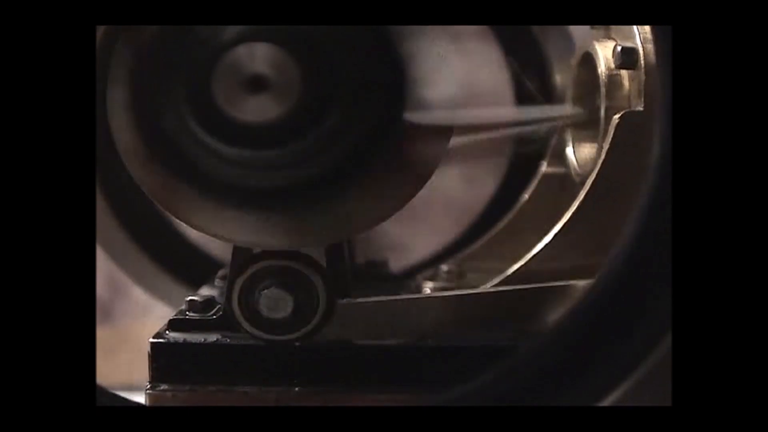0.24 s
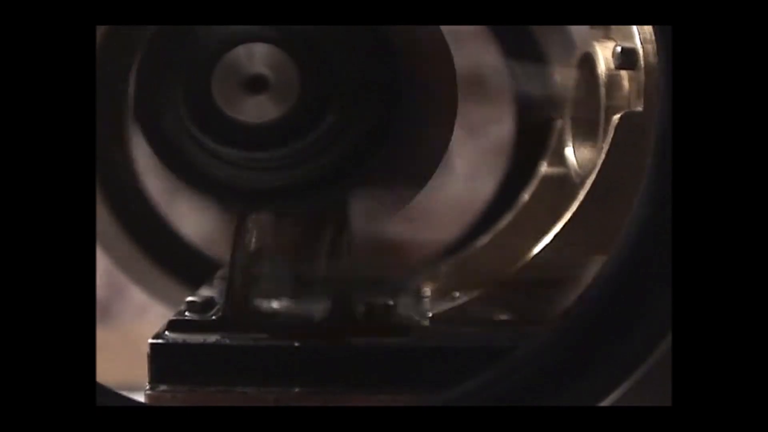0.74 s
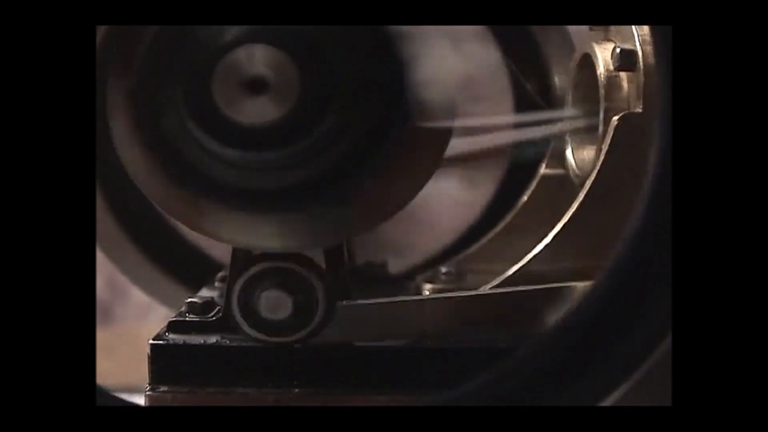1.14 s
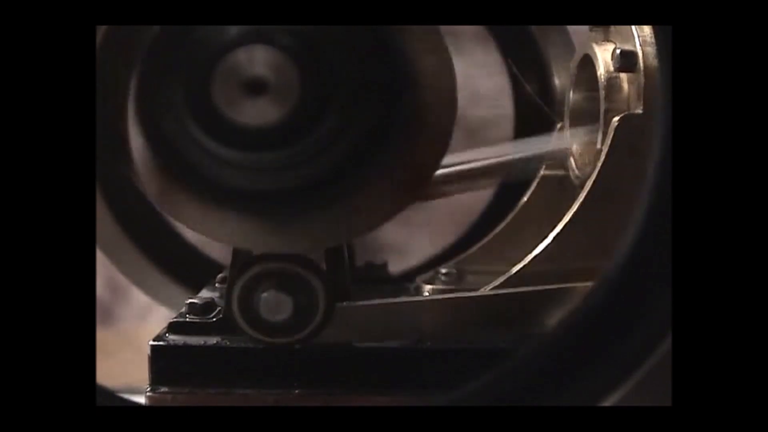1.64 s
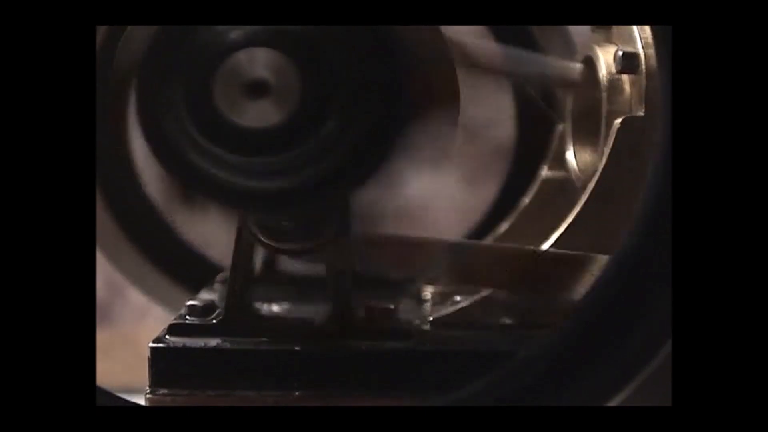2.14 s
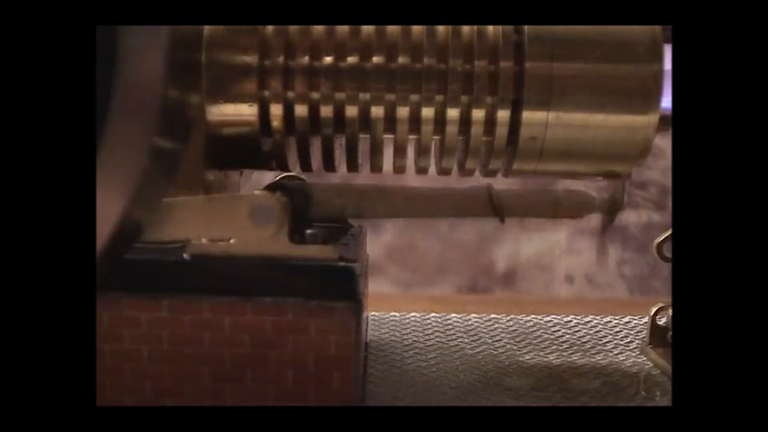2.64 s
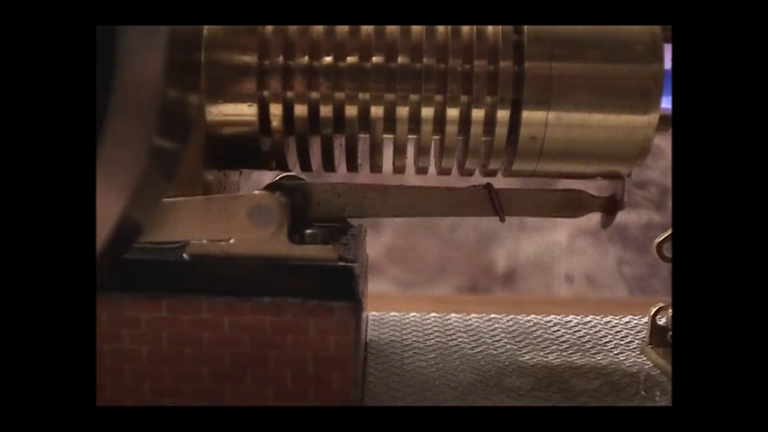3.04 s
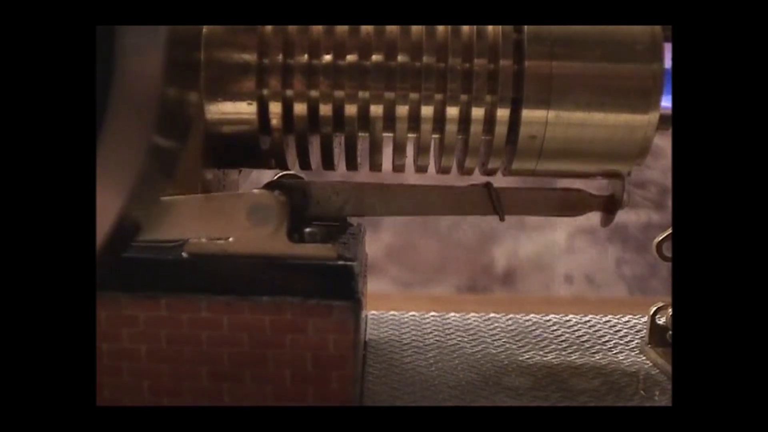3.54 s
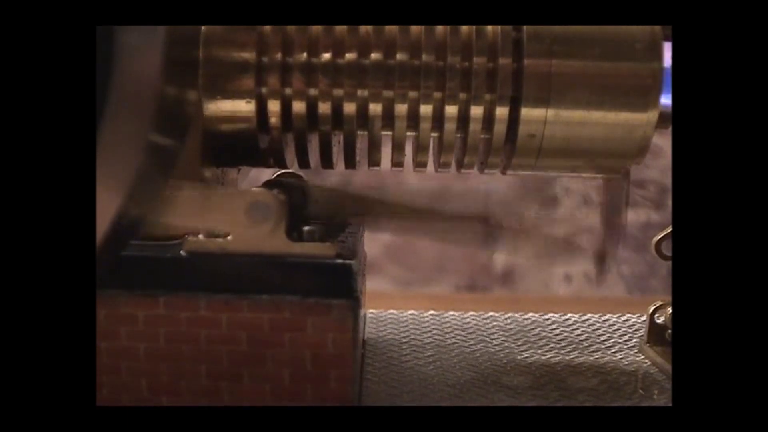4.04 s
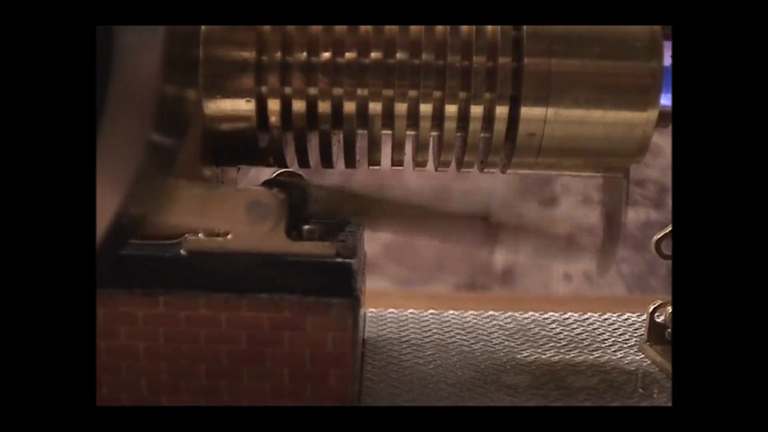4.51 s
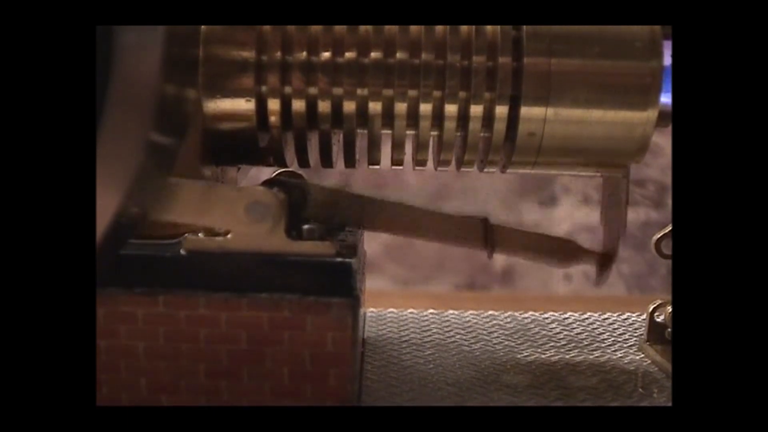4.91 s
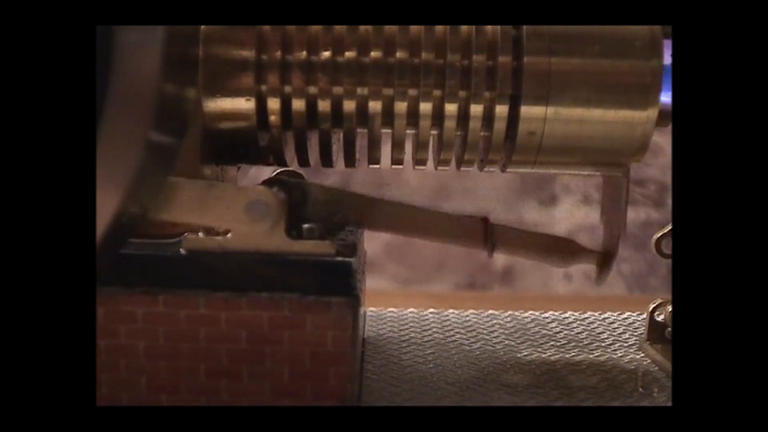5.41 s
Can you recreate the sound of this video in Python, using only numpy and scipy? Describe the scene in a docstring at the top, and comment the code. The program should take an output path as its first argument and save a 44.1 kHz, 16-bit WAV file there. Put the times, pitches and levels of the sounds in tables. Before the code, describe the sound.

Rapid, regular exhaust pops and light metallic rattling from a little flame-driven engine, with a sudden step up in pace partway through.

```python
"""A quick, even chuff and clatter: a small flame-licker engine on a bench, heard beside the flywheel,
then, running faster, beside the cylinder. On every turn the flap valve pops open and flutters in the
exhaust, the cam roller rattles, the lever knocks, and the valve is slapped shut, which rings the metal.
Bearings rub softly; the room is small and dry."""
import sys
import numpy as np
from scipy import signal
from scipy.fft import rfft, irfft
from scipy.io import wavfile
from scipy.ndimage import uniform_filter1d

SR = 44100
rng = np.random.default_rng(int(sys.argv[2]) if len(sys.argv) > 2 else 0)


def pcm_store(signal):
    """Save signal as 16-bit PCM."""
    levels = np.round(np.clip(np.atleast_2d(signal), -1, 1) * 32767)
    wavfile.write(sys.argv[1], SR, levels.astype(np.int16).T)


N = 250047
ANTIPHASE = np.array([[1], [-1]])


# Spectrum of a blow, by part: f/Hz, level/dB
FLYWHEEL_SPECTRA = {"valve": [(90, 16.5), (520, 9), (830, -3.5), (2030, 13), (2230, 1.5), (3940, 10),
                    (4650, 3.5), (5200, -1), (8000, -2), (9220, -22), (10620, -19), (11140, -42),
                    (15500, -35)], "roller": [(90, 24), (600, 6), (720, 4), (1940, 6.5), (2130, 1.5),
                    (2460, 3.5), (2970, 2.5), (3760, 11), (4540, -0.5), (5480, 10), (6620, 3.5),
                    (7630, 0.5), (10620, -8), (15500, -51)], "lever": [(90, 19.5), (720, 14), (910, 4),
                    (2130, 3.5), (2460, 14), (2970, -11), (3420, 8), (4540, 6), (6620, 8), (7630, -6),
                    (8790, 1), (13450, -18), (15500, -32)], "seat": [(90, 53), (520, -8.5), (620, -51),
                    (1000, 19), (1390, 10), (1680, 22.5), (2700, 8), (3940, 13), (4330, 1.5), (6620, 1.5),
                    (13450, -23), (15500, -38)]}
CYLINDER_SPECTRA = {"valve": [(150, -7), (300, 12), (560, 12), (790, -5), (1250, -9), (2000, 13),
                    (2700, 14.5), (3900, 7.5), (4800, 0), (5400, 1.5), (6600, -6.5), (8400, -9),
                    (10000, -16), (15500, -28)], "roller": [(90, 18), (290, 7.5), (470, -15), (600, 3),
                    (830, -22), (1100, 4), (1390, -9), (2460, 3), (3760, 6), (4330, -7), (6620, 6),
                    (7630, -2.5), (8790, 4.5), (15500, -41)], "lever": [(200, 28), (400, -6), (600, 3),
                    (1000, -5), (1400, -2), (2500, 2.5), (3700, 14), (4330, -2), (6600, 10), (7630, -5),
                    (8750, 12.5), (10200, -19), (11900, -2.5), (15500, -38)], "seat": [(200, 5.5), (420, 3),
                    (720, -12), (1150, 14.5), (1400, 2), (1720, 18), (2600, 5), (4330, 0), (6600, 0),
                    (7630, -16), (8790, -2.5), (11700, -11.5), (15500, -37)]}

def engine(turns, contacts, spectra, modes, gas, roller_ring_db, pan_db):
    """Gas and metal from one listening place; small parts radiate little bass."""
    pop = valve_pop(turns, contacts, spectra["valve"])
    rattle = roller_rattle(turns, contacts, spectra["roller"], roller_ring_db)
    knock = lever_knock(turns, contacts, spectra["lever"])
    hits = ticks_and_slap(turns, contacts, spectra["seat"])
    metal = butter(rattle + knock + hits, 3, 340, "highpass")
    chuff = butter(gas + pop, 3, 175, "highpass")
    return (chuff + metal + frame_ring(turns, contacts, modes)) * undb(ANTIPHASE * pan_db / 2)


# Crank speed: t/s, speed/rpm
FLYWHEEL_SPEED = [(0, 394.5), (0.4, 395.1), (2.47, 387.1)]
CYLINDER_SPEED = [(2.47, 467.2), (3.4, 468.8), (4.2, 464.2), (5.67, 459.9)]
# Exhaust strength, wandering with the flame: t/s, level/dB
EXHAUST_STRENGTH = [(0.0, -1), (1.02, 1.1), (1.18, -1), (1.64, 0.4), (2.1, -0.1), (2.25, 4), (2.58, -3),
                    (2.71, -1), (2.96, -2.5), (3.35, 2.7), (3.73, -2), (3.86, 4.5), (3.99, 2.7), (4.12, -3),
                    (4.25, 0.5), (4.77, 3), (4.9, -0.8), (5.55, 3.5)]

def crank(speed, first_shut_s, open_share=0.655):
    """The cam works the valve once a turn. Rows: opens/s, shuts/s, exhaust level/dB, flutter beats."""
    t = seconds(N / SR + 1) - .5
    revs = np.cumsum(np.interp(t, *np.transpose(speed))) / 60 / SR
    revs -= np.interp(first_shut_s, t, revs)
    turn = np.arange(np.interp(speed[-1][0], t, revs) + open_share)
    opens_s, shuts_s = np.interp(turn - open_share, revs, t), np.interp(turn, revs, t)
    exhaust_db = np.interp(opens_s, *np.transpose(EXHAUST_STRENGTH)) + rng.standard_normal(len(turn))
    beats = 2.46 + 0.27 * exhaust_db
    return list(zip(opens_s, shuts_s, exhaust_db, beats))


# Exhaust resonances: f/Hz, width/Hz, level/dB
EXHAUST_MODES = [(276, 105, -1), (406, 74, -1), (592.4, 79, 0), (972, 110, -3.5), (1460, 730, -3),
                 (1910, 120, -28)]

def exhaust(turns, flutter_hz, first_db, build_up, puff_ms, lead_ms, max_beats=6):
    """Gas escapes in one puff as the valve lifts, then in a few quickening ones as the flap flutters."""
    gas, t = np.zeros(N), seconds(.004) - .002
    for opens_s, _, db, beats in turns:
        # stronger exhaust: steeper puffs, faster flutter
        sigma_ms = puff_ms * undb(-.5 * db)
        puff = np.exp(-.5 * (1000 * t / sigma_ms) ** 2)
        puff /= puff.sum()
        start_s = opens_s + t[0] - lead_ms / 1000
        add(gas, start_s, undb(first_db) * puff)
        for k in range(max_beats):
            envelope = np.clip(beats - k - 1 / 3, 0, 1) * (build_up if k == 0 else 1)
            gain = envelope * undb(db + rng.standard_normal())
            beat_s = (k + 1) ** .88 / flutter_hz / (1 + .012 * db)
            add(gas, start_s + beat_s * (1 + 0.0092 * rng.standard_normal()), gain * puff)
    turbulence = 1 + 0.32 * rng.standard_normal(N)
    return resonate(gas * turbulence, EXHAUST_MODES)


def valve_pop(turns, contacts, spectrum):
    """The flap pops open with a sharp pulse."""
    force = blows(turns, contacts, "valve", spike=2.5, fresh=.35, width=.2)
    return convolve(force, colour(spectrum, lag_ms=0.52))


def ticks_and_slap(turns, contacts, spectrum):
    """Dull ticks and knocks during the stroke, then the slap of the valve shutting."""
    force = blows(turns, contacts, "seat", spike=0.28, fresh=0.49, width=0.22)
    return convolve(force, colour(spectrum, lag_ms=2.956))


def lever_knock(turns, contacts, spectrum):
    """The lever knocks before the valve shuts."""
    force = blows(turns, contacts, "lever", spike=0, fresh=0.32, width=0.19)
    return convolve(force, colour(spectrum, lag_ms=1.86))


# Roller and arm resonances: f/Hz, width/Hz, level/dB
ROLLER_MODES = [(2310, 38, 11.5), (3530, 55, 7.5), (4005, 140, 11.5), (5290, 52, 2.5), (6720, 210, 9.5),
                (8630, 14, 8.5)]

def roller_rattle(turns, contacts, spectrum, ring_db):
    """The roller rattles on the cam and rings briefly with its arm."""
    force = blows(turns, contacts, "roller", spike=0, fresh=0.9, width=0.18)
    return convolve(force, colour(spectrum, lag_ms=0.82)) + undb(ring_db) * resonate(force, ROLLER_MODES)


# Contacts per turn: phase (0 opens, 1 shuts), part, level/dB, decay/ms (capped at 4), jitter/ms
# "seat" rows: a dull tick, a knock, then the shutting slap
FLYWHEEL_BLOWS = [(-.004, "valve", 1, 1.9, 0.26), (0.224, "seat", -17, 2.5, 0.6),
                  (.299, "roller", -3.5, 0.92, 0.11), (0.413, "roller", -4, 1.1, .4),
                  (0.485, "roller", -7.5, 3, 0.38), (0.537, "roller", -16.5, 0.75, 0.7),
                  (.635, "roller", -16, 1.5, 1.6), (0.774, "roller", -7, 4.2, 1),
                  (0.849, "seat", -10.5, 1.18, 0.3), (0.95, "lever", -0.5, 1.8, .3),
                  (.988, "seat", 0, 1.4, 0.11)]
CYLINDER_BLOWS = [(-.004, "valve", -1.5, 2.05, 0.28), (0.22, "seat", -10, 2.2, 0.89),
                  (.288, "roller", -4.5, 1.23, 0.54), (.407, "roller", -1, 0.96, 0.5),
                  (.472, "roller", -3, 1.34, 0.8), (.515, "roller", -8.5, 1.45, 1.3),
                  (0.634, "roller", -23, 1.2, 2.2), (.755, "lever", -13, 2.45, 3),
                  (0.827, "seat", -9, 0.9, 0.55), (.948, "lever", -2, 1.3, 0.33),
                  (.987, "seat", 1, 1.29, 0.14)]

def blows(turns, contacts, part, spike, fresh, width):
    """Forces on one part: each contact repeats its own pattern, plus a fresh share every turn."""
    track = np.zeros((2, N))
    for phase, name, db, decay_ms, jitter_ms in contacts:
        if name != part:
            continue
        pattern = click(decay_ms)
        pattern[12] += spike
        spread_db = min(.6 + jitter_ms, 3)  # loose contacts vary in strength too
        for opens_s, shuts_s, _, _ in turns:
            late, loud = rng.standard_normal(2)
            side = click(decay_ms, passes=1)
            side -= 0.94 * np.diff(side, n=2, prepend=0, append=0)  # treble differs most between ears
            mid = unit(unit(pattern) + fresh * click(decay_ms, passes=1))
            at_s = opens_s + phase * (shuts_s - opens_s) + late * jitter_ms / 1000
            add(track, at_s, (mid + width * side * ANTIPHASE) * undb(db + loud * spread_db))
    return track


def click(decay_ms, size=1024, passes=4):
    """A click scattered through metal: dense, with a brief swell and an even spectrum."""
    age = 1000 * np.arange(size) / SR / np.clip(decay_ms, .2, 4)
    envelope = (1 - np.exp(-2 * age)) * np.exp(-age)
    x = rng.standard_normal(size) * envelope
    for _ in range(passes):
        white = irfft(np.exp(1j * np.angle(rfft(x))))
        x = white * envelope / np.sqrt(uniform_filter1d(white ** 2, size=24) + 1e-12)
    return unit(x)


# Frame modes: f/Hz, t60/s, level at flywheel/dB, level at cylinder/dB
FRAME_MODES = [(126.5, 0.26, -52, -45), (209, 0.054, -41, -40.5), (315, 0.065, -24, -29.5),
               (384, 0.075, -30, -38), (579, 0.081, -34.5, -40), (952.4, 0.2, -23.5, -31),
               (977.2, 0.21, -30, -37.5), (991, 0.083, -33, -30), (1157, 0.027, -34.5, -61),
               (1690, 0.013, -18, -21), (1938, 0.061, -24, -37), (2220, 0.024, -23.5, -32),
               (2470, 0.01, -19, -11.5)]

def frame_ring(turns, contacts, modes, delay_s=0.002028):
    """The dull ticks and knocks of the stroke and the shutting slap each ring the frame."""
    track, t = np.zeros(N), seconds(.3)
    hz, t60_s, db = np.transpose(modes)[:, :, None]
    waves = undb(db - 60 * t / t60_s) * np.sin(2 * np.pi * hz * t) * np.minimum(t / .001, 1)
    for opens_s, shuts_s, _, _ in turns:
        for phase, part, blow_db, *_ in contacts:
            if part == "seat":
                gains = undb(blow_db + rng.standard_normal(len(modes)))
                add(track, opens_s + phase * (shuts_s - opens_s) + delay_s, gains @ waves)
    return track


def room(x, t60_s, wet_db, lowpass_hz):
    """Short, soft reflections from bench and walls, partly different at each ear."""
    t = seconds(.5)
    noise = rng.standard_normal((3, len(t)))
    tail = (noise[:2] * 0.44 + noise[2]) * undb(-60 * t / t60_s) * np.minimum(t / 0.0019, 1)
    return undb(wet_db) * convolve(x, butter(unit(tail), 1, lowpass_hz))


# Spectrum of bearing rub and room air: f/Hz, level/dB
RUB_SPECTRUM = [(15, -63), (25, -22), (80, -5), (150, -18), (293, 4.5), (790, -5), (978, -2.5),
                (1420, -11.5), (1720, -8.5), (6540, -23.5), (7480, -20.5), (8780, -26.5), (15000, -40)]

def bearings(db, width):
    """A low, steady rub under the beat."""
    mid, side = convolve(rng.standard_normal((2, N)), colour(RUB_SPECTRUM))
    return undb(db) * np.sqrt(N) * (unit(mid) + width * unit(side) * ANTIPHASE)


def air_rumble(db, lowpass_hz):
    """Faint air movement on the microphone."""
    air = butter(rng.standard_normal(N), 2, lowpass_hz)
    return undb(db) * np.sqrt(N) * unit(air) * ANTIPHASE


def colour(spectrum, lag_ms=0, size=2048):
    """Impulse response for a spectrum; slow, low bending waves arrive up to lag_ms late."""
    hz, db = np.transpose(sorted(spectrum))
    f = np.maximum(np.arange(size // 2 + 1) * SR / size, 1)
    bass_cut = np.minimum((f / hz[0]) ** 2 + .05, 1)
    gain = undb(np.interp(np.log(f), np.log(hz), db)) * bass_cut
    cepstrum = irfft(np.log(gain))
    cepstrum[1:size // 2] *= 2  # fold to minimum phase
    cepstrum[size // 2 + 1:] = 0
    delay_s = lag_ms / 1000 / (1 + (f / 1300) ** 2)
    lag_rad = 2 * np.pi * np.cumsum(delay_s) * SR / size
    response = irfft(np.exp(rfft(cepstrum) - 1j * lag_rad))
    return response[:size // 2] * np.hanning(size)[size // 2:]


def resonate(x, modes):
    """Parallel resonators of alternating sign."""
    return sum((-1) ** k * undb(db) * signal.lfilter(*signal.iirpeak(hz, hz / width_hz, SR), x)
               for k, (hz, width_hz, db) in enumerate(modes))


def butter(x, order, hz, kind="lowpass"):
    return signal.sosfilt(signal.butter(order, hz, kind, fs=SR, output="sos"), x)


def convolve(x, response):
    return signal.fftconvolve(np.atleast_2d(x), np.atleast_2d(response), axes=1)[:, :N]


def add(track, start_s, sound):
    i = int(round(start_s * SR))
    lo, hi = max(i, 0), min(i + sound.shape[-1], N)
    if hi > lo:
        track[..., lo:hi] += sound[..., lo - i:hi - i]


def seconds(length_s):
    return np.arange(int(length_s * SR)) / SR


def unit(x):
    """Scale to unit energy."""
    return x / np.sqrt(np.sum(x ** 2))


def undb(db):
    return 10 ** (np.asarray(db) / 20)


def scene(cut_s=2.466):
    """A hard cut from flywheel to cylinder over a steady background."""
    turns = crank(FLYWHEEL_SPEED, first_shut_s=0.0576)
    gas = exhaust(turns, flutter_hz=250.5, first_db=0, build_up=0.43, puff_ms=0.24, lead_ms=0.74)
    modes = [(hz, t60_s, db) for hz, t60_s, db, _ in FRAME_MODES]
    flywheel = engine(turns, FLYWHEEL_BLOWS, FLYWHEEL_SPECTRA, modes, undb(24) * gas,
                      roller_ring_db=1, pan_db=-1.75)

    turns = crank(CYLINDER_SPEED, first_shut_s=2.5353)
    gas = exhaust(turns, flutter_hz=273.2, first_db=-1.5, build_up=0.62, puff_ms=0.22, lead_ms=0.83)
    modes = [(hz, t60_s, db) for hz, t60_s, _, db in FRAME_MODES]
    cylinder = engine(turns, CYLINDER_BLOWS, CYLINDER_SPECTRA, modes, undb(18.5) * gas,
                      roller_ring_db=-5, pan_db=1.5)

    direct = np.where(np.arange(N) / SR < cut_s, flywheel, cylinder)
    reflections = room(direct, t60_s=0.17, wet_db=-7, lowpass_hz=2400)
    return direct + reflections + bearings(db=-44.5, width=0.51) + air_rumble(db=-41.5, lowpass_hz=45)


def record(dry, ceiling=.7, top_hz=16000):
    """The microphone thins the deep bass, rounds the sharpest peaks and cuts the top."""
    thin = butter(dry, 1, 80, "highpass")
    rounded = ceiling * np.tanh(thin / ceiling)
    return signal.sosfilt(signal.ellip(8, .2, 70, top_hz, fs=SR, output="sos"), rounded)


dry = scene()
out = record(dry)
pcm_store(out)
```